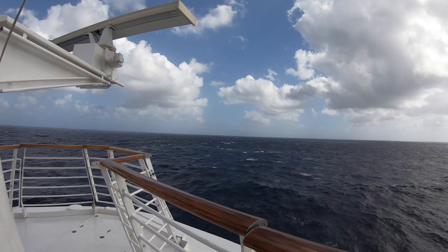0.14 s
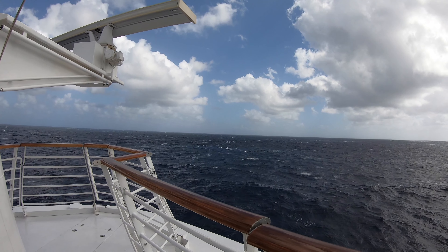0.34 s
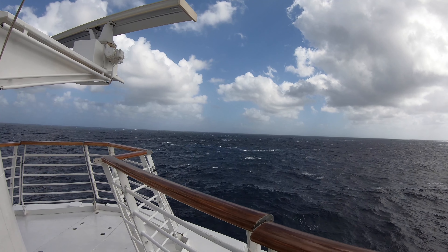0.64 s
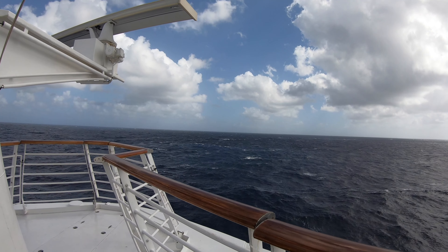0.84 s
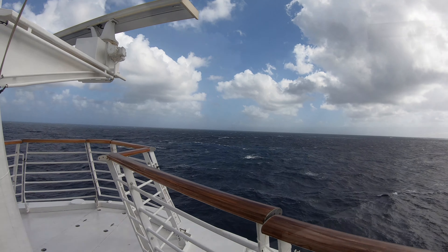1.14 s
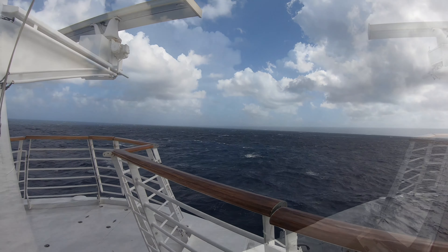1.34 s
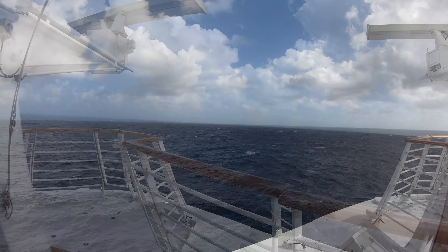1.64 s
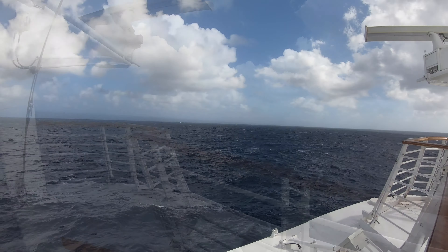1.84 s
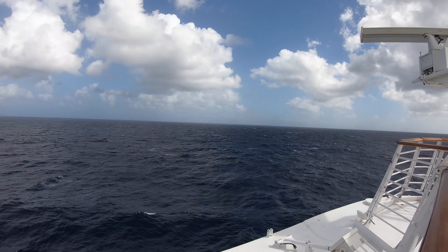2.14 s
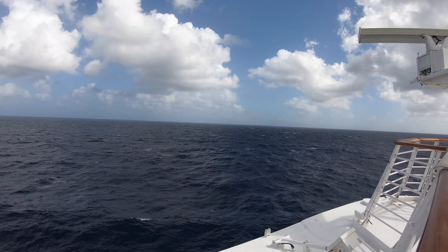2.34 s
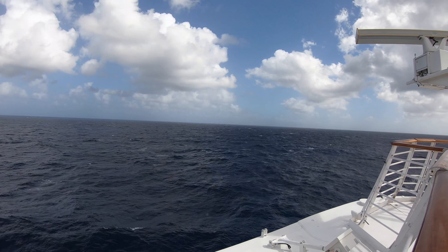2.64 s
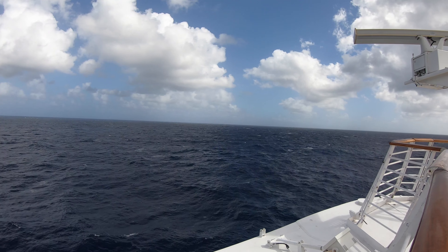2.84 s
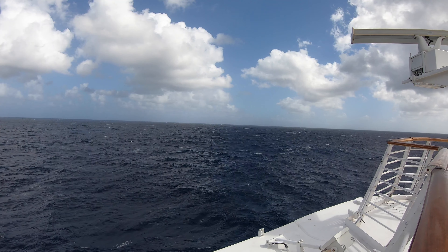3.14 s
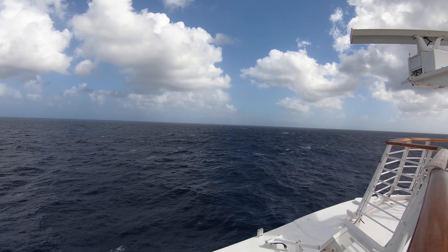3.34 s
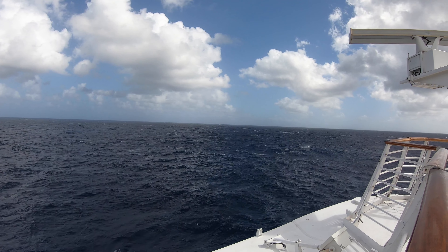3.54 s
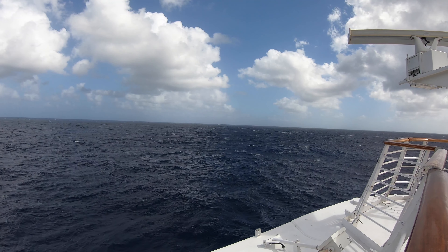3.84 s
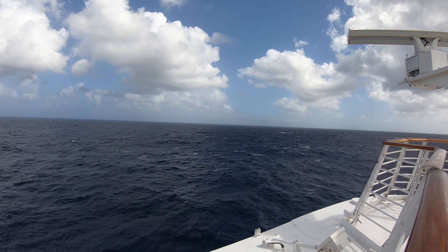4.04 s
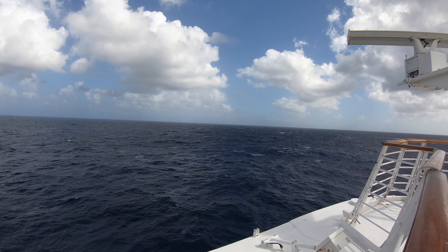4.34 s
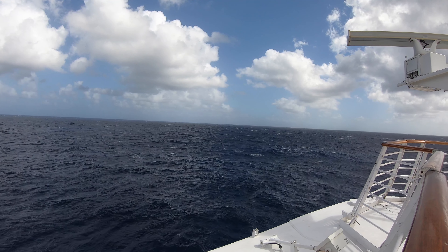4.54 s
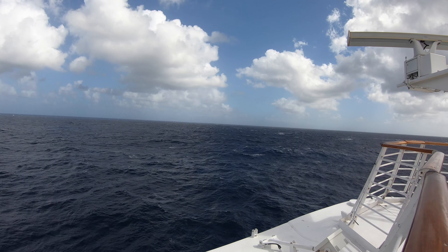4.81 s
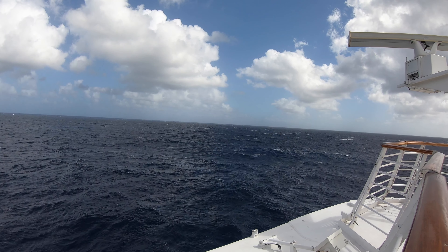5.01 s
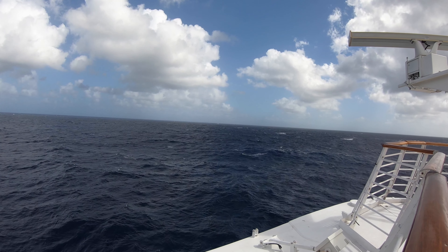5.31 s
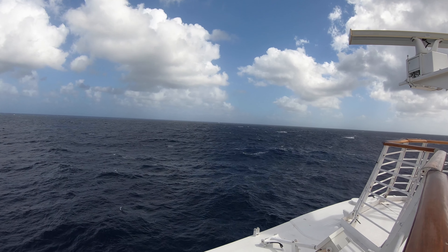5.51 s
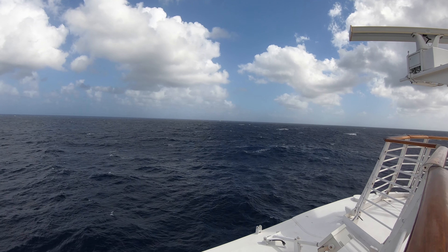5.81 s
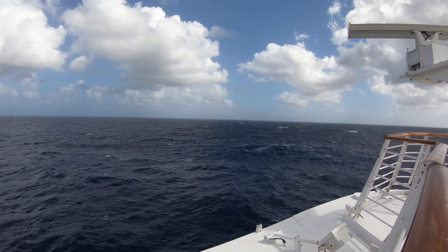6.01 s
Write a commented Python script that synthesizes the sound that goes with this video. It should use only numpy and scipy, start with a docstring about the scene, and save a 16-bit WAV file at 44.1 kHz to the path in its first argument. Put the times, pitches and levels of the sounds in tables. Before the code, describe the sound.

Strong wind pounds a small microphone on a ship's open upper deck, deep uneven rumble with flapping buffets, rushing air and one falling whoosh.

```python
"""Open upper deck of a moving ship in strong wind, heard through one small microphone.
Eddies pound the port with a deep rumble, flap against the housing and now and then break in a rough puff.
Air and sea rush behind in shaped noise; one whoosh, noise replayed ever slower, falls in pitch.
A railing whistles faintly near the end as a wavering sine; a limiter holds down the bass peaks."""
import sys
import numpy as np
from scipy import signal
from scipy.fft import rfft, irfft
from scipy.io import wavfile
from scipy.ndimage import uniform_filter1d, minimum_filter1d

SR = 44100
rng = np.random.default_rng(int(sys.argv[2]) if len(sys.argv) > 2 else 0)


def to_wav(sig):
    """Store sig (one row per channel, or 1-D mono) as 16-bit WAV at the path in sys.argv[1].

    Samples outside -1..1 are clipped; the rate is SR.
    """
    pcm = np.clip(np.atleast_2d(sig), -1, 1) * 32767
    pcm = np.round(pcm).astype(np.int16)
    wavfile.write(sys.argv[1], SR, pcm.T)  # frames by channels


N = 272097
TIME = np.arange(N) / SR  # s
HZ = np.fft.rfftfreq(N, 1 / SR)


def gain_of(db):
    """Decibels to amplitude."""
    return 10 ** (np.asarray(db) / 20)


def evened(x):
    """Scales to an rms of one."""
    return x / np.sqrt(np.mean(x ** 2) + 1e-20)


def curves(rows):
    """Each column of a timed table, interpolated at every sample."""
    time_s, *columns = np.transpose(rows)
    return [np.interp(TIME, time_s, column) for column in columns]


def noise(gain):
    """Random pressure of rms one, shaped by the gain at each frequency."""
    spectrum = rfft(rng.standard_normal(N))
    return evened(irfft(spectrum * gain, N))


def coloured(points):
    """Noise whose spectrum joins the points on a log-frequency axis and ends with them."""
    point_hz, point_db = np.transpose(points)
    db = np.interp(np.log(HZ + 1), np.log(point_hz), point_db)
    return noise(gain_of(db) * (HZ < point_hz[-1]))


def flutter(hz):
    """Chance swings of rms one, mostly slower than hz."""
    drift_cut = HZ / (HZ + 2)
    return noise(drift_cut / (1 + (HZ / hz) ** 2))


def smooth(x, length_s):
    """Triangular running mean: two box means of the given length."""
    size = max(int(length_s * SR), 1)
    return uniform_filter1d(uniform_filter1d(x, size), size)


def sustained(x, window_s):
    """Keeps the strength of a turbulent flow even over the window."""
    return x / np.sqrt(smooth(x ** 2, window_s) + 1e-9)


def swell(centre_s, length_s):
    """Smooth rise and fall of height one."""
    return np.exp(-2 * ((TIME - centre_s) / length_s) ** 2)


def band(hz, centre_hz, spread_oct):
    """Bell of gain around a centre on an octave axis."""
    octaves = np.log2((hz + 1) / centre_hz)
    return np.exp(-(octaves / spread_oct) ** 2 / 4)


def add(mix, centre_s, sound):
    """Mixes in a sound centred on the given time."""
    at = round(centre_s * SR) - len(sound) // 2 + np.arange(len(sound))
    inside = (at >= 0) & (at < len(mix))
    mix[at[inside]] += sound[inside]


# Colour of the deep rumble. Each row: frequency in Hz, spectrum level in dB per Hz (relative).
RUMBLE_COLOUR = [(10, -14.5), (20, -11), (30, -6.5), (45, 1.5), (63, 1), (80, 0), (100, -6.5), (150, -22),
                 (400, -38), (1000, -92)]
# Colour of the wake's throb. Each row: frequency in Hz, spectrum level in dB per Hz (relative).
THROB_COLOUR = [(50, -37.5), (80, -1.5), (95, -4.5), (125, -2), (150, -9), (200, -23), (600, -71.5)]
# Strength of the wake shed by the housing, also played by buffet(). Each row: time in seconds, level in dB.
WAKE = [(0, -25.5), (.75, -23), (.95, -24), (1.12, -22), (1.27, -23), (1.36, -26.5), (1.7, -26),
        (2.4, -26.5), (2.85, -25.5), (3.04, -27), (3.15, -27), (3.6, -26), (3.85, -25.5), (4.1, -22.5),
        (4.5, -24.5), (5.3, -26), (6.17, -26.5)]
# Stream swings onto the microphone (surge, +) or slips off it (lull, -), also used by buffet().
# Each row: centre in seconds, change of deep rumble in dB, change of throb in dB, length in seconds.
SWINGS = [(0.111, 9.5, 2.5, 0.041), (0.221, -10, -1.5, 0.041), (0.396, -10.5, -5.5, 0.03),
          (0.498, -8, 4.5, 0.044), (0.556, -6.5, 2, 0.043), (0.668, 5, 2.5, .06), (0.828, -10, 0, 0.035),
          (0.938, -6, 3.5, 0.099), (1.076, 0, 3.5, 0.074), (1.218, -4, 15, 0.034),
          (1.304, -12.5, -3, 0.015), (1.485, -5.5, -1.5, 0.06), (1.61, -6.5, -2, 0.1),
          (1.753, -9.5, -1, 0.041), (1.92, 2, 6.5, 0.082), (2.103, 6, 3.5, 0.04), (2.147, -7.5, -2, 0.026),
          (2.295, 3, -3.5, 0.046), (2.407, -8, 2.5, 0.026), (2.546, 7.5, -1.5, 0.046),
          (2.646, -10.5, -1, 0.019), (2.782, 7.5, -7, 0.041), (2.906, 1, -5, 0.022),
          (2.998, 2, -1.5, 0.026), (3.097, -12.5, -0.5, 0.034), (3.35, 3.5, 0, 0.32),
          (3.53, 1, 10.5, 0.027), (3.72, 6.5, 1.5, 0.02), (3.778, -4.5, 0, 0.018), (4, -8.5, -1.5, 0.035),
          (4.313, -3, -11.5, 0.018), (4.428, -8, -6.5, 0.026), (4.49, 3, -4, 0.051),
          (4.607, 0.5, -6, 0.033), (4.646, 4, 11, 0.019), (4.912, 10, -0.5, 0.029),
          (5.051, -2, -0.5, 0.046), (5.526, 4, -2.5, 0.04), (5.69, 2, -9, 0.027), (5.893, 4, -14.5, 0.08),
          (5.971, 1, 10, 0.045), (6.027, -7, -6.5, .02)]
RUMBLE_DB, THROB_RE_DEEP_DB = -15.5, -4
WAKE_USUAL_DB, THROB_DB_PER_WAKE_DB = -26, 0.28


def rumble(surge_db=1.0, surge_hz=12):
    """Large eddies press on the microphone as the stream swings; the wake throbs above them."""
    wake_db, = curves(WAKE)
    deep_db, throb_swing_db = np.zeros(N), np.zeros(N)
    for centre_s, deep_change_db, throb_change_db, length_s in SWINGS:
        swing = swell(centre_s, length_s)
        deep_db += deep_change_db * swing
        throb_swing_db += throb_change_db * swing
    throb_db = THROB_RE_DEEP_DB + THROB_DB_PER_WAKE_DB * (wake_db - WAKE_USUAL_DB) + throb_swing_db
    deep = gain_of(deep_db) * sustained(coloured(RUMBLE_COLOUR), window_s=0.064)
    throb = gain_of(throb_db) * sustained(coloured(THROB_COLOUR), window_s=0.05)
    return gain_of(RUMBLE_DB + surge_db * flutter(surge_hz)) * evened(deep + throb)


# Colour of the flapping. Each row: frequency in Hz, spectrum level in dB per Hz (relative).
BUFFET_COLOUR = [(60, -39.5), (130, -6), (180, 2.5), (260, -1), (310, -4), (370, -8.5), (480, -17.5),
                 (800, -25), (2000, -37), (6000, -70.5)]
BUFFET_DB_PER_LULL_DB = 0.29


def buffet(eddies, flutter_db=2.0, burst_db=1.0, burst_hz=18):
    """Smaller eddies flap against the housing in quick bursts and slacken in the lulls."""
    level_db, = curves(WAKE)
    lull_db = np.zeros(N)
    for centre_s, deep_change_db, _, length_s in SWINGS:
        lull_db += BUFFET_DB_PER_LULL_DB * min(deep_change_db, 0) * swell(centre_s, length_s)
    flapping = coloured(BUFFET_COLOUR) * gain_of(flutter_db * eddies)
    gain = gain_of(level_db + lull_db + burst_db * flutter(burst_hz))
    return gain * sustained(flapping, window_s=0.13)


def patchy(x, patch_db=0.9, patch_hz=30, lowest_hz=500, count=4):
    """Small passing eddies lift or dip one octave or another for a moment."""
    octave = np.clip(np.log2((HZ + 1) / lowest_hz), 0, count - 1)
    spectrum, out = rfft(x), np.zeros(N)
    for k in range(count):
        share = np.maximum(1 - abs(octave - k), 0)  # triangles that sum to one
        out += irfft(spectrum * share, N) * gain_of(patch_db * flutter(patch_hz))
    return out


# Wind over the deck, with one gust early on. Each row: time in seconds, strength in dB against the usual.
WIND = [(0, -1.5), (.5, -2), (.78, -0.2), (.99, -0.4), (1.08, 2.9), (1.3, 2), (1.35, 0), (1.48, -1.5),
        (1.8, -1), (2.3, 0.9), (2.9, 0), (3.3, -1.5), (3.65, 1), (3.85, -1.4), (4.25, 1), (4.53, 0.7),
        (4.61, -0.5), (4.72, 1), (5.25, 1.5), (5.6, 0.5), (6.0, 1.5), (6.17, 0.5)]
# Colour of the broad rush. Each row: frequency in Hz, spectrum level in dB per Hz (relative).
RUSH_COLOUR = [(150, -18), (400, 4), (600, 2.5), (900, -0.6), (1500, -3.5), (2400, -9.5), (3300, -11.5),
               (4000, -19), (5000, -26.5), (7000, -45), (12000, -74)]
# Colour of the fine hiss. Each row: frequency in Hz, spectrum level in dB per Hz (relative).
HISS_COLOUR = [(2000, -19), (3500, 0), (4800, 1.5), (5600, -3), (6400, -5), (7200, -3.5), (8300, -6),
               (9200, -12.5), (9800, -18), (10500, -17.5), (11300, -26.5), (12000, -36.5), (13400, -29),
               (14500, -54.5)]
# Hiss rises (+) or sinks (-) briefly. Each row: centre in seconds, change in dB, length in seconds.
HISS_SWELLS = [(0.138, 4, 0.083), (0.41, 2.5, .025), (1.132, 3, 0.066), (1.248, 3, 0.099),
               (1.757, -2, 0.15)]
RUSH_DB, HISS_DB = -33.5, -50.5  # in the usual wind
HISS_DB_PER_WIND_DB = 0.97


def airflow(eddies, rush_eddy_db=-0.05, rush_flutter_db=1.25,
            hiss_eddy_db=0.6, hiss_flutter_db=1.0, gustiness_db=0.6):
    """Broad rush and fine hiss follow the wind; the hiss also rises with the eddies; each flutters."""
    wind_db = curves(WIND)[0] + gustiness_db * flutter(8.7)
    rush_db = RUSH_DB + wind_db
    hiss_db = HISS_DB + HISS_DB_PER_WIND_DB * wind_db
    for centre_s, change_db, length_s in HISS_SWELLS:
        hiss_db += change_db * swell(centre_s, length_s)
    rush_gain = gain_of(rush_eddy_db * eddies + rush_flutter_db * flutter(170))
    hiss_gain = gain_of(hiss_eddy_db * eddies + hiss_flutter_db * flutter(120))
    rush = coloured(RUSH_COLOUR) * rush_gain
    hiss = coloured(HISS_COLOUR) * hiss_gain
    return gain_of(rush_db) * evened(patchy(rush)) + gain_of(hiss_db) * evened(hiss)


# Eddies that break on the port.
# Each row: centre in seconds, level in dB, length in seconds, centre in Hz, spread in octaves.
PUFFS = [(0.086, -39, 0.026, 2520, 0.2), (0.128, -18, 0.024, 250, 0.59), (0.143, -28.5, 0.012, 680, 0.58),
         (0.159, -25.5, 0.013, 520, 0.49), (0.427, -47, 0.018, 2700, 0.58), (0.583, -26, 0.02, 450, 0.3),
         (0.605, -28.5, 0.024, 520, 0.65), (0.648, -22.5, 0.01, 388, 0.16), (0.655, -40, 0.01, 2460, 0.22),
         (0.69, -16, 0.011, 250, 0.32), (0.759, -13.5, 0.02, 181, 0.33), (0.776, -34, 0.016, 950, 0.38),
         (0.871, -22.5, 0.015, 450, 0.42), (1.169, -37.5, 0.13, 1730, 0.4), (1.239, -19, 0.015, 180, 0.41),
         (1.3, -39, 0.032, 2200, 0.44), (1.417, -41, 0.027, 2480, 0.4), (1.428, -23.5, 0.015, 440, 0.54),
         (1.509, -32, 0.03, 480, 0.24), (1.688, -38.5, 0.017, 2740, 0.17),
         (1.767, -35.5, 0.013, 2430, 0.33), (1.837, -20.5, 0.01, 559, 0.48), (1.895, -38, 0.015, 880, 0.3),
         (1.992, -33, 0.026, 483, 0.43), (2.209, -26, 0.015, 480, 0.34), (2.461, -21, 0.03, 224, 0.41),
         (3.267, -20.5, 0.018, 218, 0.27), (3.725, -22, 0.016, 205, 0.52), (4.03, -20.5, 0.07, 210, 0.35),
         (4.388, -27.5, 0.016, 460, 0.23), (4.99, -35.5, 0.051, 1200, 0.4), (5.692, -32, 0.012, 520, 0.54),
         (5.825, -28, 0.011, 520, 0.38)]
PUFF_RISE, PUFF_FALL = 0.7, 1.15  # build and decay times, as multiples of the length


def puffs(tear_db=0.5, size=16384):
    """Each breaking eddy is a band of noise, low thump to thin rip, that hits fast and dies slower."""
    out = np.zeros(N)
    tearing = gain_of(tear_db * flutter(150))
    offset_s = (np.arange(size) - size // 2) / SR
    bins_hz = np.fft.rfftfreq(size, 1 / SR)
    side = np.where(offset_s < 0, PUFF_RISE, PUFF_FALL)
    for centre_s, level_db, length_s, centre_hz, spread_oct in PUFFS:
        spectrum = rfft(rng.standard_normal(size)) * band(bins_hz, centre_hz, spread_oct)
        burst = sustained(irfft(spectrum), window_s=0.013)
        envelope = np.exp(-2 * (offset_s / length_s / side) ** 2)
        add(out, centre_s, gain_of(level_db) * envelope * burst)
    return out * tearing


# Band of rushing air that falls in pitch. Each row: time in seconds, centre in Hz, level in dB.
WHOOSH = [(1.5, 6500, -66), (1.545, 5900, -56), (1.6, 5000, -59), (1.66, 3900, -47), (1.72, 2588, -45),
          (1.815, 2052, -40), (1.845, 1047, -41), (1.92, 860, -31), (1.97, 800, -37), (2.03, 778, -39),
          (2.16, 687, -63)]


def whoosh(spread_oct=0.27):
    """A band of air noise, read ever slower, slides down from a thin hiss to a full rush."""
    centre_hz, level_db = curves(WHOOSH)
    lowest_hz = centre_hz.min()
    travel = np.cumsum(centre_hz / lowest_hz) % N  # read position in samples
    air = np.interp(travel, np.arange(N), noise(band(HZ, lowest_hz, spread_oct)))
    sounding = (TIME > WHOOSH[0][0]) & (TIME < WHOOSH[-1][0])
    return gain_of(level_db) * sustained(air, window_s=0.02) * sounding


# Wind singing on a railing. Each row: time in seconds, pitch in Hz, level in dB.
WHISTLE = [(5.72, 2145, -56), (5.82, 2110, -50), (5.89, 2015, -40), (5.95, 2010, -45), (6.02, 2144, -54),
           (6.1, 2080, -45), (6.17, 2070, -53)]


def whistle(waver=0.027, flutter_db=4):
    """A faint, fuzzy tone glides in pitch as the table sets, with a quick random waver."""
    pitch_hz, level_db = curves(WHISTLE)
    turns = np.cumsum(pitch_hz * (1 + waver * flutter(120))) / SR
    tone = evened(np.sin(2 * np.pi * turns) * gain_of(flutter_db * flutter(40)))
    return gain_of(level_db) * tone * (TIME > WHISTLE[0][0])


def scene():
    """Sums the layers; buffet and airflow share one eddy signal."""
    eddies = flutter(69.5)
    mix = rumble() + buffet(eddies) + airflow(eddies) + puffs() + whoosh() + whistle()
    return mix[None]


def limited(x, ceiling_db, hold_s):
    """Turns the gain down around every peak that would pass the ceiling."""
    room = np.minimum(gain_of(ceiling_db) / (abs(x) + 1e-9), 1)
    held_gain = minimum_filter1d(room, max(int(hold_s * SR), 1))
    return x * smooth(held_gain, hold_s / 2)


EDGE_HZ, BASS_HZ, FADE_IN_S = 15100, 400, 0.004


def record(dry):
    """A fast limiter on the bass, a soft start, then the band limit."""
    bass = signal.sosfiltfilt(signal.butter(2, BASS_HZ, fs=SR, output="sos"), dry[0])
    held = dry[0] - bass + limited(bass, ceiling_db=-7.5, hold_s=0.008)
    fade_in = np.minimum(TIME / FADE_IN_S, 1)
    edge = signal.butter(16, EDGE_HZ, fs=SR, output="sos")
    return signal.sosfiltfilt(edge, held * fade_in)[None]


dry = scene()
out = record(dry)
to_wav(out)
```